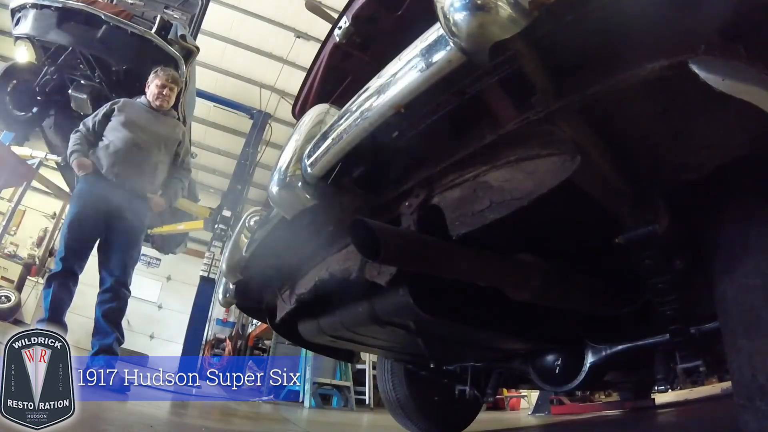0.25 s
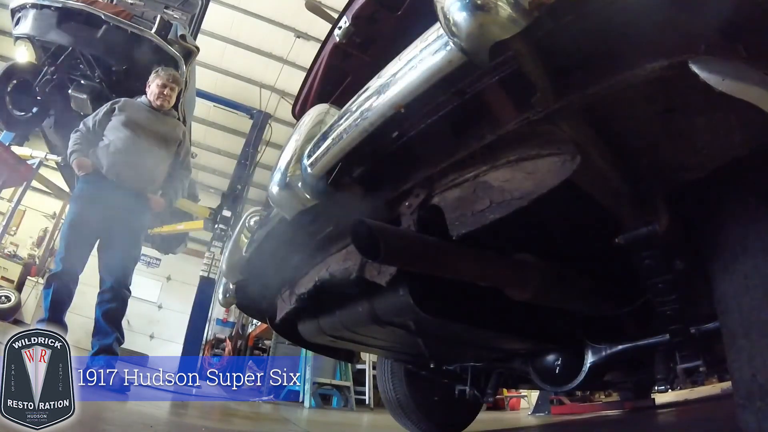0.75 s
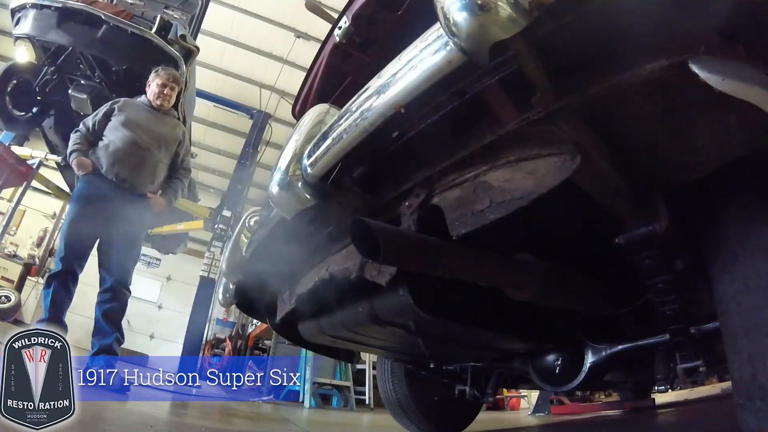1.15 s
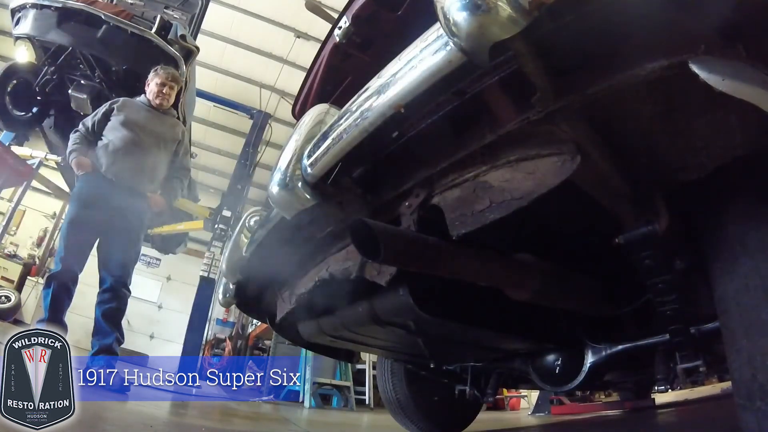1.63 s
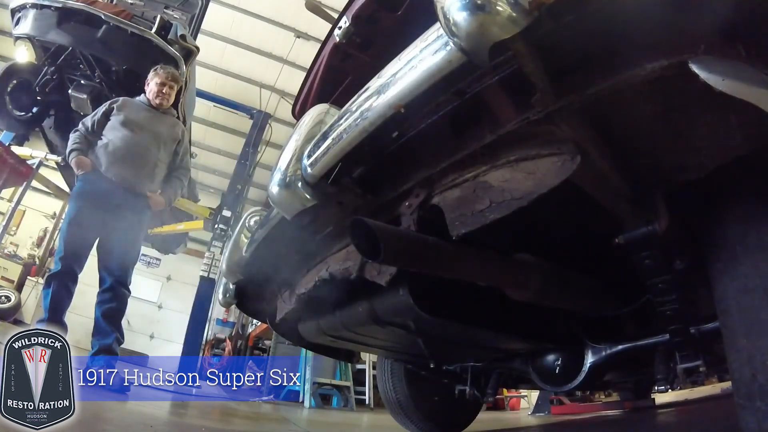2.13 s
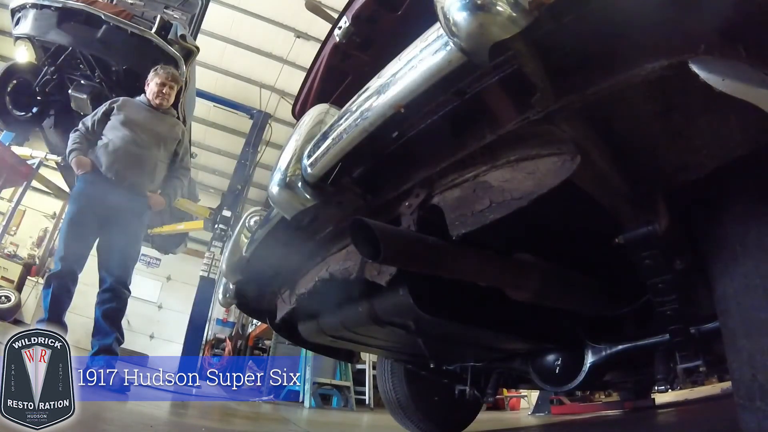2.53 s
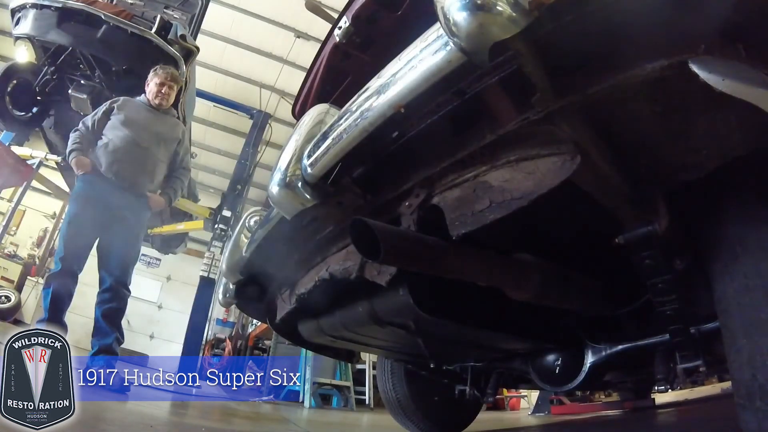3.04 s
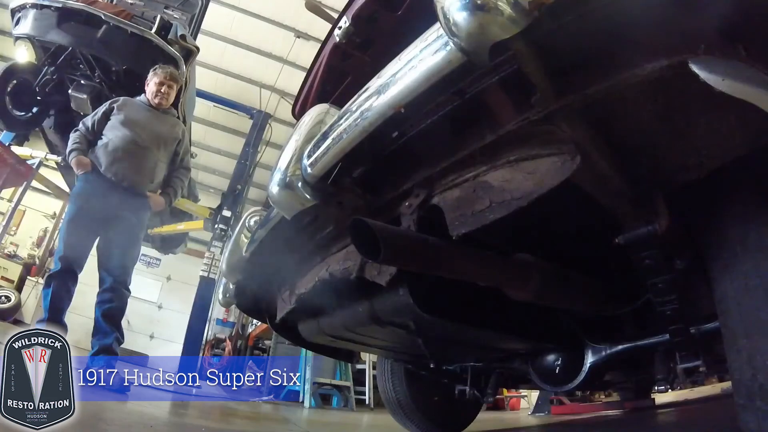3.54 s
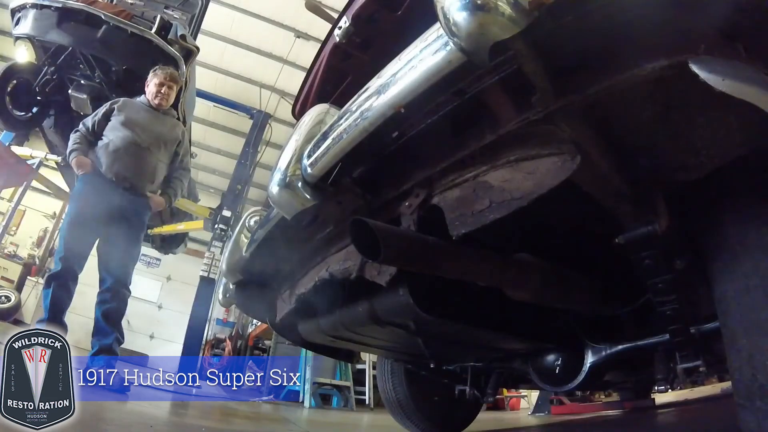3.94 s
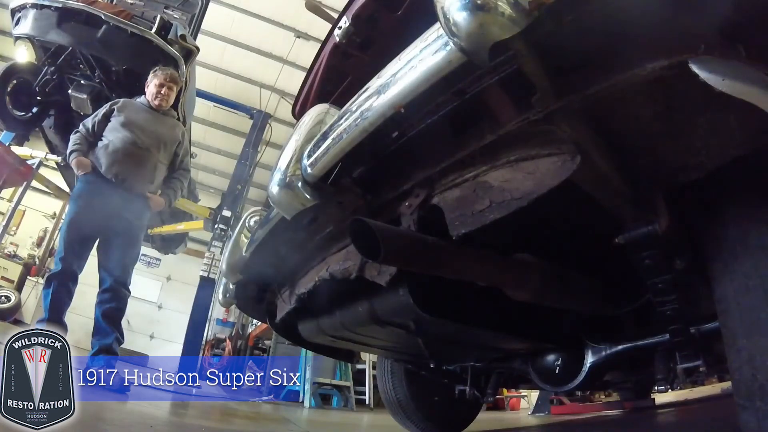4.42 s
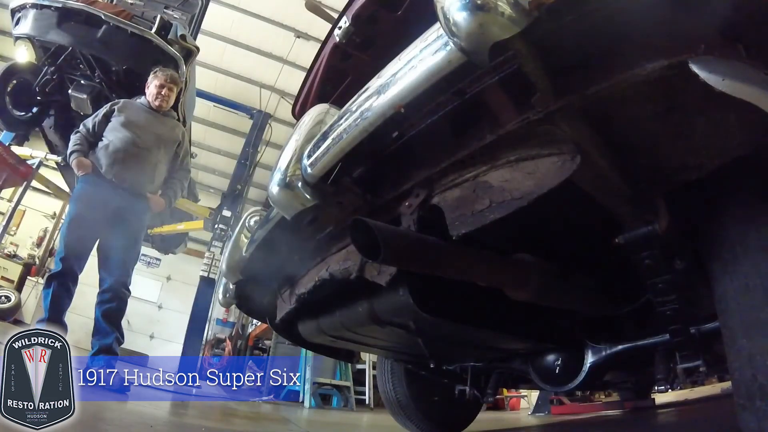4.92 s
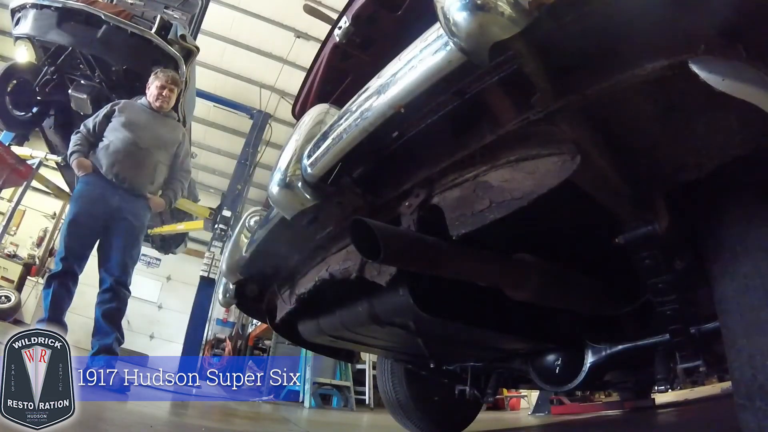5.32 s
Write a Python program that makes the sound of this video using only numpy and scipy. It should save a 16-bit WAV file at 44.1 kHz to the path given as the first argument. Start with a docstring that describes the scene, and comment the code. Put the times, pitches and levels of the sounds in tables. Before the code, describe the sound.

An old car engine idles with a deep, steady throb and light metallic clacks, heard close to the tailpipe.

```python
"""The deep throb of an old car engine idling in a workshop, heard close to its tailpipe.
Eight cylinders take turns to fire, and their uneven exhaust pulses repeat every engine cycle.
The pulses knock on the silencer's chambers and make the gas in the pipe hum. Each opening valve
lets out a puff that rings the pipe walls, some with a clack or a sharp tick.
Behind it all is the steady rush of the fan and the air intake."""
import sys
import numpy as np
from scipy import signal
from scipy.fft import rfft, irfft
from scipy.io import wavfile

SR = 44100
rng = np.random.default_rng(int(sys.argv[2]) if len(sys.argv) > 2 else 0)


def store_pcm(level_fs):
    """Save levels as 16-bit WAV."""
    pcm = np.round(np.clip(level_fs, -1, 1) * 32767).astype(np.int16)
    wavfile.write(sys.argv[1], SR, np.atleast_2d(pcm).T)


N = 245637

# the crankshaft's speed as the idle wanders: time_s, speed_rpm
IDLE_SPEED = [(0.0, 543.8), (0.31, 558.3), (0.59, 538.2), (0.85, 546.5), (1.19, 536.1), (1.98, 560.6),
              (2.38, 533.2), (2.86, 553.9), (3.17, 559.6), (3.51, 540.1), (3.57, 540.0), (3.81, 535.8),
              (4.13, 553.0), (4.82, 535.3), (5.06, 554.6), (5.57, 559.6)]
# the tone colour of the background rush: pitch_hz, relative_level_db
RUSH_COLOUR = [(250, -23), (350, -9.5), (520, -8), (640, -14), (705, -17.5), (780, -20), (958, -15),
               (1150, -23.5), (1375, -17.5), (1520, -27.5), (2700, -35.5), (3380, -34.5), (3900, -39),
               (6500, -48), (9500, -56), (12000, -88)]
# the loudest high ticks: start_s, strength_db
LOUD_TICKS = [(0.2274, -33), (0.446, -41), (0.582, -44), (1.1087, -42), (1.5516, -32), (2.364, -32),
              (2.4252, -36), (2.5635, -38), (2.701, -33), (2.8624, -36), (2.9183, -38), (3.0806, -42),
              (3.3514, -35), (3.7384, -47), (3.962, -42), (4.181, -39), (4.6193, -43), (4.8409, -37),
              (5.2784, -40), (5.494, -39)]
# the loudest clacks: start_s, strength_db, hollow_pitch_hz
LOUD_CLACKS = [(0.1133, -32.5, 2200), (0.2262, -34, 1610), (0.3305, -32, 1430), (0.3848, -29.5, 1340),
               (0.4429, -27, 1340), (0.5493, -36, 2100), (0.604, -42, 1350), (0.7711, -35, 2200),
               (0.827, -26.5, 1330), (0.885, -29.5, 1590), (0.9918, -33, 1380), (1.047, -34, 1750),
               (1.1038, -27.5, 1390), (1.1293, -32, 1440), (1.2136, -31, 2090), (1.27, -33, 1590),
               (1.3288, -36, 1400), (1.4914, -30, 1520), (1.5473, -27, 1400), (1.7085, -35, 1570),
               (1.872, -38, 1640), (1.9252, -31.5, 2180), (2.0872, -37, 2200), (2.142, -31.5, 2220),
               (2.1979, -26.5, 1420), (2.363, -29.5, 1350), (2.7508, -37, 1380), (2.8065, -35.5, 1950),
               (3.0774, -38, 1390), (3.185, -48, 1410), (3.2365, -32.5, 1330), (3.3998, -34, 1430),
               (3.4555, -33, 1350), (3.512, -32.5, 1560), (3.5409, -37, 1350), (3.6763, -35, 1350),
               (3.8442, -42, 2220), (3.9002, -30.5, 1460), (3.9564, -39, 1520), (4.2058, -32, 1390),
               (4.2842, -37, 1460), (4.339, -29, 1390), (4.5039, -24, 1650), (4.5585, -32, 2270),
               (4.6186, -29, 1360), (4.8385, -40, 1700), (4.8673, -34, 2230), (5.003, -36.5, 1550),
               (5.0578, -26, 1700), (5.1654, -31, 2230), (5.2757, -31, 1640), (5.3802, -40, 1430),
               (5.434, -32, 1540), (5.4902, -36, 1900)]
# each cylinder's puff and tick, in firing order (a crest is the top of an exhaust pulse):
# puff_at_1400_hz_db, puff_at_3300_hz_db, puff_at_6500_hz_db, tick_db, puff_before_crest_ms
CYLINDER_PUFFS = [(5, -2, 1, -37, 7.1), (-6.5, -0.5, -4.5, -77, 8.3), (0.5, -7.5, -6.5, -41.5, 2.3),
                  (-3.5, -2, -7, -76.5, 5.4), (1, 1.5, -2.5, -61.5, 9.7), (3.5, -6, 0, -52, 7.7),
                  (-0.5, 1, 1, -65.5, 8.9), (0.5, -3.5, -6, -63.5, 8.3)]
# the ringing of the pipe walls and engine block: pitch_hz, width_hz, level_db
WALL_RINGS = [(973, 190, -56), (1372, 130, -58.5), (1650, 140, -61), (1910, 80, -66), (2194, 150, -61),
              (2720, 370, -61.5), (3150, 95, -65), (3340, 170, -58), (3540, 250, -62.5), (4850, 230, -71.5),
              (5280, 320, -77), (5560, 240, -78.5), (6510, 650, -71), (7440, 300, -79.5),
              (8760, 3000, -80.5)]
# the ringing of the gas inside the pipe: pitch_hz, width_hz, level_db
GAS_RINGS = [(37, 8, -40), (73, 14, -39), (110, 16, -41), (135, 10, -42), (170, 11, -35), (402, 18, -57),
             (525, 30, -55), (704, 14, -62), (226, 22, -45), (260, 16, -43), (312, 12, -44), (345, 20, -49)]
# the ringing of the silencer's five chambers: pitch_hz, ring_ms, loudest_after_crest_ms
CHAMBER_RINGS = [(229.8, 6.6, -0.5), (250.9, 3.9, 12.1), (312.7, 6.5, -2.1), (400.6, 3.8, -2.1),
                 (530.5, 5.6, 0.4)]
# how hard each cylinder knocks the chambers, in firing order: chamber_1_db, ..., chamber_5_db
CHAMBER_KNOCKS = [(-33, -42, -31.5, -45, -50), (-35.5, -24, -30, -40, -44), (-32, -42.5, -33, -50, -43),
                  (-22.5, -45, -45.0, -44.5, -50.5), (-41, -26.5, -25.5, -35.5, -44),
                  (-26.5, -29.5, -36, -36, -53), (-24.5, -31.5, -27, -35, -40.5),
                  (-45.5, -22.5, -47.5, -44, -49)]
# the pitches that the silencer weakens: pitch_hz, width_hz, share_removed
SILENCER_DIPS = [(195.3, 10, 0.27), (287.2, 5.7, 0.68), (377.4, 48, 0.46)]
# the tones of the throb: waves_per_cycle, level_db (8 is the firing tone; uneven cylinders add the rest)
THROB_TONES = [(4, -44), (5, -44), (7, -49.5), (8, -15.5), (9, -41), (10, -43.5), (11, -48.5), (12, -38.5),
               (13, -36.5), (14, -45.5), (15, -39), (16, -20), (17, -43), (18, -46), (19, -40), (21, -32.5),
               (22, -46.5), (23, -38.5), (24, -25), (25, -41.5), (26, -43), (27, -38.5), (29, -27.5),
               (31, -38.5), (32, -31.5), (33, -34.5), (34, -51), (35, -33.5), (36, -41), (37, -26),
               (39, -54), (40, -37.5)]


def from_db(db):
    """Turn decibels into a number to multiply a sound by."""
    return 10 ** (np.asarray(db) / 20)


def unit_level(x):
    """Scale a sound so that its average (rms) level is 1."""
    return x / np.sqrt(np.mean(x ** 2) + 1e-20)


def resonate(x, hz, width_hz):
    """Let a sound ring at one pitch; a smaller width rings longer."""
    r = np.exp(-np.pi * width_hz / SR)
    feedback = [1, -2 * r * np.cos(2 * np.pi * hz / SR), r * r]
    return signal.lfilter([(1 - r * r) / 2, 0, (r * r - 1) / 2], feedback, x)


def spikes(times_s, sizes):
    """Put a one-sample spike at each of the given times."""
    out, at = np.full(N, 1e-18), np.round(np.asarray(times_s) * SR).astype(int)
    inside = (at >= 0) & (at < N)
    np.add.at(out, at[inside], np.asarray(sizes)[inside])
    return out


def swell(marks, rise_s, fall_s):
    """Turn each spike into a bump that rises and dies away."""
    up, down = np.exp(-1 / (rise_s * SR)), np.exp(-1 / (fall_s * SR))
    return signal.lfilter([1 - up], np.convolve([1, -up], [1, -down]), marks)


def end_dip(start_s=5.05, db_per_s=-7):
    """A volume curve that stays at 1, then sinks a little at the end."""
    return from_db(db_per_s * np.maximum(np.arange(N) / SR - start_s, 0))


def rpm(t):
    """The crankshaft's turns per minute at the times t."""
    return np.interp(t, *np.transpose(IDLE_SPEED))


def firing_times(first_crest_s=.0107):
    """When each pulse crests, in seconds: eight per engine cycle, the strongest cylinder first."""
    t = np.arange(-SR // 2, N + SR // 2) / SR
    cycles = np.cumsum(rpm(t) / 120) / SR  # one cycle is two turns
    cycles += 1 - np.interp(first_crest_s, t, cycles)
    return np.interp(np.arange(8 * int(cycles[-1]) + 1) / 8, cycles, t)


def per_firing(table, firings):
    """Pick the row of the cylinder whose turn it is at each firing."""
    return np.array(table)[np.arange(len(firings)) % 8]


def fan_rush(level_db=-45):
    """The fan and air intake make a steady noise that fills the workshop."""
    hz = np.arange(1, N // 2 + 2) * SR / N
    corner_hz, corner_db = np.transpose(RUSH_COLOUR)
    colour = from_db(np.interp(np.log(hz), np.log(corner_hz), corner_db))
    return from_db(level_db) * unit_level(irfft(rfft(rng.standard_normal(N)) * colour, N))


def tailpipe_ticks(firings, sputter_rate=270):
    """The steepest pulses snap as they leave the pipe, and droplets sputter out with each puff."""
    tick_db = per_firing(CYLINDER_PUFFS, firings)[:, 3]
    marks = spikes(firings, from_db(tick_db + 2.5 * rng.standard_normal(len(firings))))
    start_s, strength_db = np.transpose(LOUD_TICKS)
    marks += spikes(start_s, from_db(strength_db))
    flow = swell(spikes(firings - .008, np.ones(len(firings))), .003, .0067)
    droplet_db = -55 + 4 * np.minimum(rng.exponential(1, N), 3)
    marks += (rng.random(N) < flow * sputter_rate / SR) * from_db(droplet_db)
    snap = swell(marks, .00069, .0006) * rng.standard_normal(N)
    return signal.sosfilt(signal.butter(3, [1600, 7500], "band", fs=SR, output="sos"), snap)


def metal_clacks(firings, bright_hz=3232, spread_hz=290, spit_db=-15, length=2000):
    """Metal rattles briefly at a hollow and a bright pitch while the gas spits."""
    out, t = np.zeros(N + length), np.arange(length) / SR
    spit_band = signal.butter(2, [1300, 3800], "band", fs=SR, output="sos")
    for start_s, strength_db, hollow_hz in LOUD_CLACKS:
        noise = rng.standard_normal((2, length))
        pushes = noise * (1 - np.exp(-t / .00059)) * np.exp(-t / .004)
        clack = from_db(spit_db) * signal.sosfilt(spit_band, pushes[0])
        pitches_hz = (hollow_hz, bright_hz + spread_hz * noise[1, 0])
        strongest = np.searchsorted(firings, start_s) % 8 == 0
        levels_db = (-5.2, -24.5) if strongest else (-9, -7.5)  # the strongest cylinder sounds hollow
        for push, hz, level_db, width_hz in zip(pushes, pitches_hz, levels_db, (260, 170)):
            rattle = resonate(resonate(push, hz, width_hz), hz, 6.3 * width_hz)
            clack += from_db(level_db) * rattle / np.abs(rattle).max()
        at = round(start_s * SR)
        out[at:at + length] += from_db(strength_db) * clack
    return out[:N]


def valve_puffs(firings, colour_spread_db=5.5, clack_boost_db=1.5):
    """Each opening valve lets out a burst of gas that rings the walls, never twice the same."""
    count, cylinders = len(firings), per_firing(CYLINDER_PUFFS, firings)
    start_s = firings - cylinders[:, 4] / 1000 + .00052 * rng.standard_normal(count)
    has_clack = np.abs(start_s[:, None] - np.array(LOUD_CLACKS)[:, 0]).min(axis=1) < .008
    strength_db = 1.2 * rng.standard_normal(count)
    out = np.zeros(N)
    for hz, width_hz, level_db in WALL_RINGS:
        cylinder_db = [np.interp(np.log(hz), np.log([1400, 3300, 6500]), row[:3]) for row in cylinders]
        colour_db = colour_spread_db * np.clip(rng.standard_normal(count), -3, 1.3)
        is_metal = hz < 4000  # above this is the hiss of the gas, which builds more slowly
        puff_db = cylinder_db + strength_db + colour_db + clack_boost_db * has_clack * is_metal
        marks = spikes(start_s, from_db(puff_db))
        burst = swell(marks, .0016, .0039) if is_metal else swell(marks, .0056, .0053)
        burst += .13 * swell(marks, .0088, .026)  # a soft tail
        ring = resonate(resonate(burst * rng.standard_normal(N), hz, width_hz), hz, 4.7 * width_hz)
        out += from_db(level_db) * unit_level(ring)
    return out


def gas_hum(firings):
    """No two firings are alike: random pushes and swirls make the gas in the pipe ring."""
    out = np.zeros(N)
    for hz, width_hz, level_db in GAS_RINGS:
        marks = spikes(firings - .003, rng.standard_normal(len(firings)))
        pushes = unit_level(resonate(marks, hz, width_hz))
        swirls = unit_level(resonate(rng.standard_normal(N), hz, width_hz))
        out += from_db(level_db) * resonate(pushes + .74 * swirls, hz, 2.6 * width_hz)
    return out


def chamber_knocks(firings, spread_db=3):
    """Every pulse knocks each silencer chamber, which swells and fades on its own pitch."""
    out, knocks_db = np.zeros(N), per_firing(CHAMBER_KNOCKS, firings)
    for (hz, ring_ms, after_ms), peak_db in zip(CHAMBER_RINGS, knocks_db.T):
        ring_s = ring_ms / 1000
        t = np.arange(round(8 * ring_s * SR)) / SR
        knock = t / ring_s * np.exp(1 - t / ring_s) * np.cos(2 * np.pi * hz * (t - ring_s))
        sizes = from_db(peak_db + spread_db * rng.standard_normal(len(firings)))
        out += signal.fftconvolve(spikes(firings + after_ms / 1000 - ring_s, sizes), knock)[:N]
    return out


def silencer(x):
    """The silencer's chambers cancel part of the sound at a few pitches."""
    for hz, width_hz, share in SILENCER_DIPS:
        x = x - share * resonate(x, hz, width_hz)
    return x


def exhaust_throb(firings, mean_rpm=548, db_per_rpm=.0953, cycle_hz=4.55, pipe_hz=178, sharpness=5):
    """The exhaust pulses, built from tones that mostly crest together at the strongest cylinder."""
    t = np.arange(N) / SR
    cycle_angle = 2 * np.pi * np.interp(t, firings, np.arange(len(firings)) / 8)
    firing_tone, other_tones = np.zeros(N), np.zeros(N)
    for waves, level_db in THROB_TONES:
        if waves == 8:  # the open pipe end sends out the firing tone ahead of the crest
            firing_tone = from_db(level_db) * np.cos(waves * cycle_angle + 1)
            continue
        family, shift_rad = waves % 8, 0
        if family == 2 or (family == 4 and waves > 16):  # some pulses take a longer way
            shift_rad = -2
        elif family in (1, 5):  # the beat between cylinder groups lags above the pipe's own pitch
            ratio = waves * cycle_hz / pipe_hz
            shift_rad = -np.arctan2(ratio / sharpness, 1 - ratio ** 2)
        elif family in (0, 3) and waves > 16:  # the pulse's sharp front outruns its body
            shift_rad = .65
        other_tones += from_db(level_db) * np.cos(waves * cycle_angle + shift_rad)
    speed_gain = from_db(db_per_rpm * (rpm(t) - mean_rpm))  # faster is louder
    return np.sqrt(2) * (speed_gain * firing_tone + end_dip() * other_tones)


def scene():
    """Mix the throb with the pipe noises and the background rush, in one channel."""
    firings = firing_times()
    hollow = silencer(chamber_knocks(firings) + gas_hum(firings))
    clatter = valve_puffs(firings) + tailpipe_ticks(firings) + metal_clacks(firings)
    return (exhaust_throb(firings) + end_dip() * (hollow + clatter + fan_rush()))[None]


def record(dry, cutoff_hz=14700):
    """Cut away the very highest treble."""
    return signal.sosfilt(signal.cheby2(12, 70, cutoff_hz, fs=SR, output="sos"), dry)


dry = scene()
out = record(dry)
store_pcm(out)
```